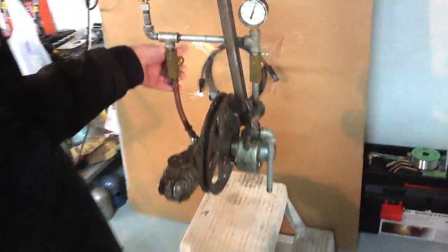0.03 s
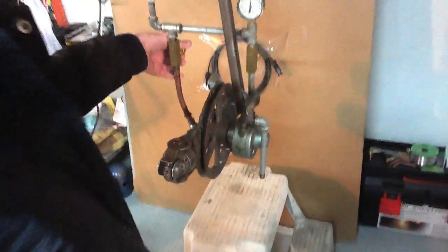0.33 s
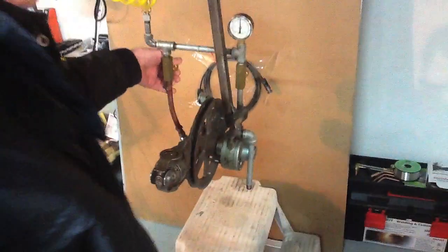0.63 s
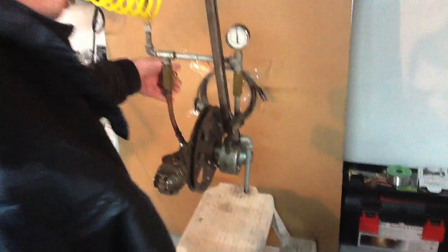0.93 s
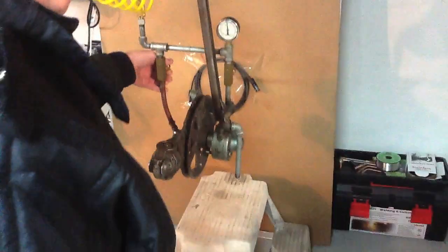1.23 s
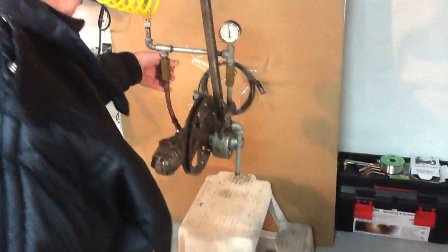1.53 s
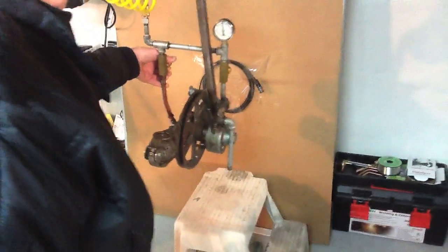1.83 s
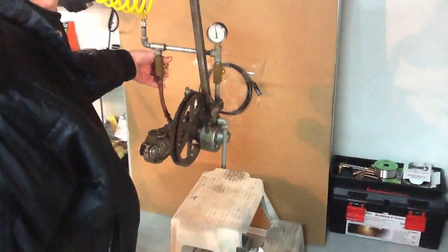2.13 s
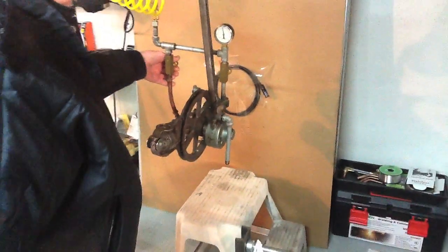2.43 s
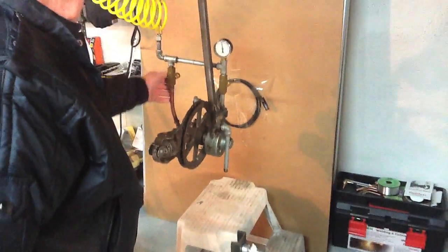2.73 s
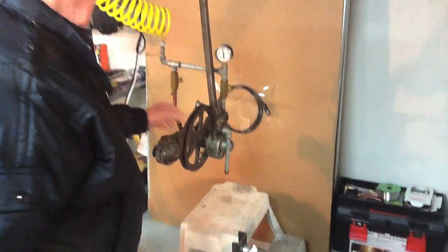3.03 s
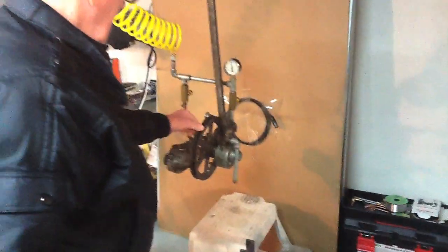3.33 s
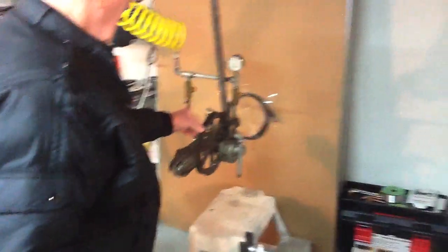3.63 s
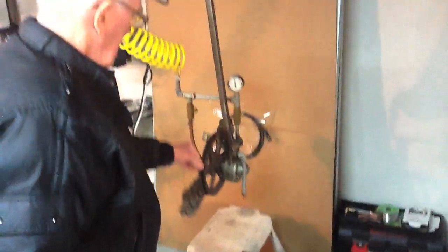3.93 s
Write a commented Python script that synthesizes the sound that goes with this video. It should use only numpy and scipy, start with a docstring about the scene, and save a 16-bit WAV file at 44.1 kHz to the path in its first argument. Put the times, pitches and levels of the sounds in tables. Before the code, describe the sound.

A loud, steady hiss of compressed air over a small air motor's thin, climbing whine.

```python
"""Compressed air blows through a small air motor that spins up a belt wheel in a workshop.
From the start the exhaust hisses loudly and rings pipes and housing; a few soft shuffles come early on.
Then the hiss grows, and under it a shaft hum and thin whines climb with the speed, loudest near the end.
All along, boards and walls reflect the sound to a hand-held microphone that drifts a little."""
import sys
import numpy as np
from scipy import signal
from scipy.fft import rfft, irfft
from scipy.io import wavfile
from scipy.ndimage import map_coordinates

SR = 44100
rng = np.random.default_rng(int(sys.argv[2]) if len(sys.argv) > 2 else 0)


def pcm_store(signal):
    """Save signal as 16-bit PCM."""
    levels = np.round(np.clip(np.atleast_2d(signal), -1, 1) * 32767)
    wavfile.write(sys.argv[1], SR, levels.astype(np.int16).T)


N = 176400


# The tone colour of the exhaust. Each row: frequency in Hz, relative strength in dB.
EXHAUST_COLOUR = [(25, -63), (52, -61), (75, -47), (105, -44.5), (150, -39), (260, -30.5), (450, -25.5),
                  (680, -18), (1080, -18), (1300, -13), (1550, -8), (2200, -1.5), (2600, -2), (3500, -3.5),
                  (4500, -8), (5400, -14), (7500, -20.5), (10700, -30), (12800, -44), (15200, -53)]
# Where pipes and housing ring. Each row: pitch in Hz, width in Hz, boost in dB.
PIPE_RINGS = [(704, 25, 3.5), (908, 32, 4), (1050, 82, 2), (1167, 50, 3.5), (1332, 52, 4), (1533, 34, 5),
              (1696, 96, 1.5), (1878, 44, 3.5), (2112, 42, 4), (2372, 45, 3), (2776, 57, 0.5),
              (3290, 160, 1.5), (3650, 100, 1.5), (4350, 43, 2.5)]
# How hard the air blows. Each row: time in seconds, hiss level in dB.
AIR_FLOW = [(0, -21), (.2, -19.5), (.3, -18.5), (.5, -19), (.7, -16.5), (.8, -18), (.92, -17.5),
            (1.0, -19.2), (1.4, -18.5), (1.75, -16.5), (1.95, -16), (2.5, -15), (3.05, -15), (3.4, -14.5),
            (3.7, -15), (3.88, -14.5), (4, -15)]

def exhaust():
    """Rushing air rings the pipes; its loudness follows the flow and flutters a little."""
    flare_db, flutter_db, flutter_hz = -9, .45, 22.2
    pipes = unit(echoes(noise(EXHAUST_COLOUR, PIPE_RINGS)) + undb(flare_db) * pipe_flares())
    return pipes * undb(curve(AIR_FLOW) + flutter_db * walk(flutter_hz))


def pipe_flares():
    """Swirling air stirs each pipe ring in spells, so the rings come and go."""
    swell_db, swell_hz = 4.5, 6
    f, colour, out = np.fft.rfftfreq(N, 1 / SR), np.array(EXHAUST_COLOUR), 0
    for hz, width, boost_db in PIPE_RINGS:
        ring = unit(irfft(rfft(rng.standard_normal(N)) / (1 + ((f - hz) / (.5 * width)) ** 2), N))
        drive_db = np.interp(np.log(hz), np.log(colour[:, 0]), colour[:, 1])
        spell_db = swell_db * np.minimum(walk(swell_hz), 2)
        out = out + ring * np.sqrt(width) * undb(drive_db + boost_db + spell_db)
    return unit(out)


# The tone colour of the spray. Each row: frequency in Hz, relative strength in dB.
SPRAY_COLOUR = [(1500, -18), (4000, 18.5), (6500, -10.5), (10500, -22.5), (13000, -18), (15200, -28)]

def spray():
    """A fine spray of air hisses steadily at the outlet."""
    return undb(-43) * noise(SPRAY_COLOUR)


# How fast the shaft spins. Each row: time in seconds, turns per second.
SHAFT_SPEED = [(0, 175.5), (.5, 186), (1, 197.6), (1.75, 215.5), (2.5, 233), (3.2, 249.5), (3.65, 258.6),
               (4, 265.7)]

def machine():
    """The turning parts speed up together and share one slight wobble."""
    wobble = 1 + .00087 * walk(rate=29.6)
    shaft_hz = curve(SHAFT_SPEED) * wobble
    tones = rotor_whine(wobble) + bearing_whistle(shaft_hz) + shaft_hum(shaft_hz)
    return room(tones) + belt(shaft_hz)


# The rotor's whine. Each row: time in seconds, pitch in Hz, level in dB.
ROTOR_WHINE = [(0, 1562, -31), (.5, 1635, -39.5), (1.05, 1778, -31), (1.25, 1857, -32), (1.4, 1848, -26),
               (1.6, 1915, -36.5), (1.9, 1980, -29.5), (2.45, 2093, -30.5), (2.8, 2182, -23.5),
               (3.02, 2238, -18.5), (3.35, 2327, -20), (3.55, 2377, -24), (3.72, 2399, -27),
               (3.89, 2446, -19.5), (4, 2490, -37)]

def rotor_whine(wobble):
    """The rotor gives a thin whine that climbs as it spins up."""
    return tone(curve(ROTOR_WHINE) * wobble, curve(ROTOR_WHINE, axis=2))


# The bearing's whistle. Each row: time in seconds, level in dB, level of the octave above in dB.
BEARING_LEVELS = [(0, -50, -68), (1, -42, -64), (1.7, -39, -62), (2.05, -47, -57), (2.45, -46, -49),
                  (2.8, -42, -55), (3.08, -38, -65), (3.2, -30, -68), (3.3, -40, -68), (3.52, -43, -69),
                  (3.65, -33, -70), (3.76, -46, -71), (3.88, -37, -72), (4, -41, -72)]

def bearing_whistle(shaft_hz):
    """The bearing vibrates 23.3 times for each turn of the shaft, and at twice that rate."""
    hz = 23.3 * shaft_hz
    return tone(hz, curve(BEARING_LEVELS)) + tone(2 * hz, curve(BEARING_LEVELS, axis=2))


# The shaft's hum. Each row: time in seconds, level in dB, level of the octave above in dB.
HUM_LEVELS = [(0, -78, -49.5), (.7, -65, -54.5), (1.05, -64.5, -65), (2.2, -69, -60), (2.8, -56, -49),
              (3.45, -49.5, -47), (3.64, -37, -42), (3.78, -62, -43), (3.97, -40.5, -40.5)]

def shaft_hum(shaft_hz):
    """The shaft hums at its turning rate and at twice that; a shaky pitch makes it rough."""
    hz = shaft_hz * (1 + .013 * walk(rate=45))
    return tone(hz, curve(HUM_LEVELS)) + tone(2 * hz, curve(HUM_LEVELS, axis=2))


# The tone colour of belt and wheel. Each row: frequency in Hz, relative strength in dB.
BELT_COLOUR = [(60, -43), (150, -9.5), (280, -5.5), (550, -2), (900, 0), (1400, -7), (3000, -20)]

def belt(shaft_hz):
    """Belt and wheel make a low rush that grows louder with speed."""
    top_speed_db, db_per_doubling = -40.5, 28
    level_db = top_speed_db + db_per_doubling * np.log2(shaft_hz / shaft_hz.max())
    return noise(BELT_COLOUR, PIPE_RINGS) * undb(level_db)


# The tone colour of a shuffle. Each row: frequency in Hz, relative strength in dB.
SHUFFLE_COLOUR = [(50, -45), (130, -11.5), (220, -3.5), (420, -0.5), (720, 5.5), (1200, 8.5), (3000, -28)]
# The shuffles. Each row: loudest moment in seconds, fade time on either side in seconds, level in dB.
SHUFFLE_SWELLS = [(0.093, 0.059, -37.5), (0.16, 0.24, -37), (0.564, 0.047, -38.5), (1.608, 0.046, -47)]

def shuffles():
    """Brief, dull swells of rubbing noise near the microphone."""
    t = np.arange(N) / SR
    swells = sum(undb(db) * np.exp(-((t - peak) / fade) ** 2) for peak, fade, db in SHUFFLE_SWELLS)
    return noise(SHUFFLE_COLOUR) * swells


def echoes(x, count=12):
    """Short echoes from boards and walls; their delays drift as the microphone moves."""
    echo_db, drift_s, drift_hz = -9, .0001, .95
    out = x.copy()
    for delay_s in rng.uniform(.004, .03, count):
        place = np.arange(N) - (delay_s + drift_s * walk(drift_hz)) * SR
        out += undb(echo_db) / np.sqrt(count) * map_coordinates(x, [place], order=3, mode="mirror")
    return unit(out)


def room(x):
    """Sound lingers briefly in the workshop and pulses against a rising tone."""
    fade_s, room_db = .63, -15.5  # fade_s is the time to fall by 60 dB
    t = np.arange(SR // 2) / SR
    tail = rng.standard_normal(len(t)) * np.exp(-np.log(1000) * t / fade_s)
    return x + undb(room_db) * signal.fftconvolve(x, tail / np.linalg.norm(tail))[:N]


def noise(colour, rings=()):
    """Rushing noise with a given tone colour, boosted at each ring."""
    f, rows = np.fft.rfftfreq(N, 1 / SR), np.array(colour, float)
    db = np.interp(np.log(f + 1), np.log(rows[:, 0]), rows[:, 1])
    for hz, width, boost_db in rings:
        db = db + boost_db / (1 + (2 * (f - hz) / width) ** 2)
    return unit(irfft(rfft(rng.standard_normal(N)) * undb(db), N))


def tone(hz, db):
    """A pure tone that follows a pitch while its loudness wavers."""
    waver_db = 2.5 * walk(rate=24)
    return np.sqrt(2) * undb(db + waver_db) * np.sin(2 * np.pi * np.cumsum(hz) / SR)


def walk(rate):
    """A smooth random wander of about 1 either way; a higher rate in Hz moves faster."""
    f = np.fft.rfftfreq(2 * N, 1 / SR)
    return unit(irfft(rfft(rng.standard_normal(2 * N)) * np.exp(-(2 * f / rate) ** 2)))[:N]


def curve(table, axis=1):
    """Join the points in one column of a table with straight lines over time."""
    rows = np.array(table, float)
    return np.interp(np.arange(N) / SR, rows[:, 0], rows[:, axis])


def undb(db):
    """Turn decibels into a number to multiply by."""
    return 10 ** (np.asarray(db) / 20)


def unit(x):
    """Scale a signal to an average strength (rms) of 1."""
    return x / np.sqrt(np.mean(x ** 2))


def scene():
    """Air, machine and shuffles at one microphone."""
    return (exhaust() + spray() + machine() + shuffles())[None]


def record(dry):
    """The sound fades in quickly and loses its highest treble."""
    fade_in_s, top_hz = .003, 15200
    opening = np.minimum(np.arange(N) / (fade_in_s * SR), 1)
    return signal.sosfilt(signal.ellip(12, .1, 90, top_hz, fs=SR, output="sos"), dry * opening)


dry = scene()
out = record(dry)
pcm_store(out)
```